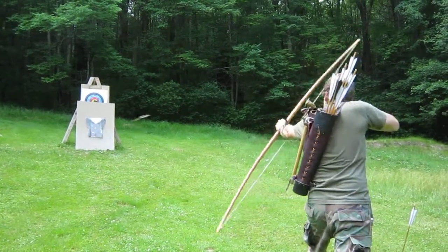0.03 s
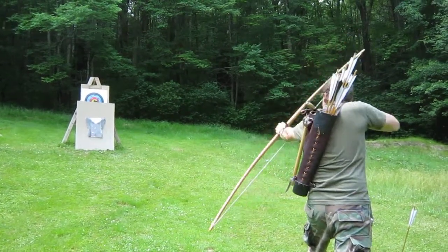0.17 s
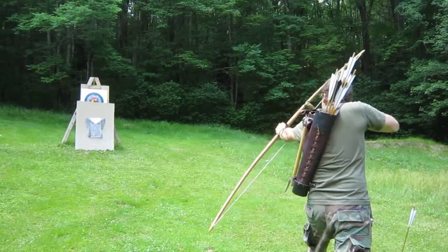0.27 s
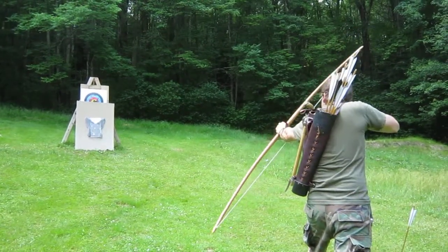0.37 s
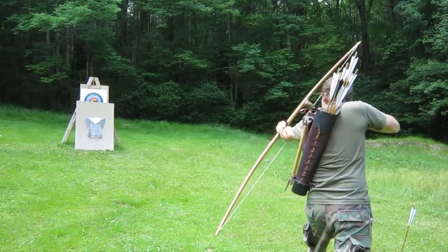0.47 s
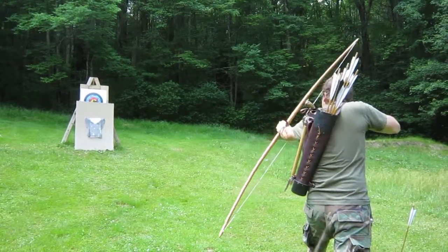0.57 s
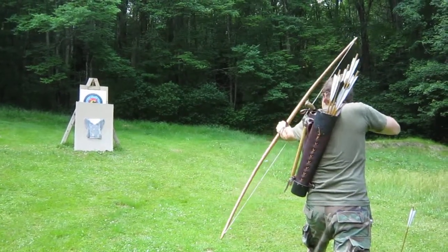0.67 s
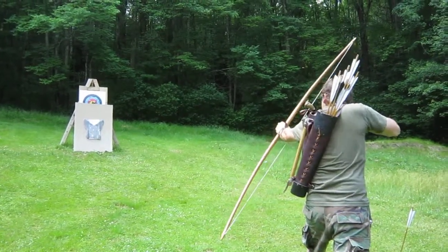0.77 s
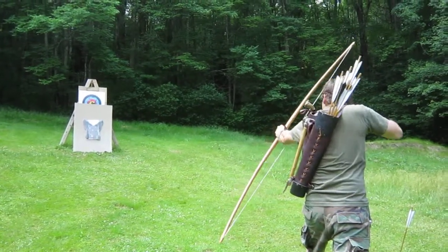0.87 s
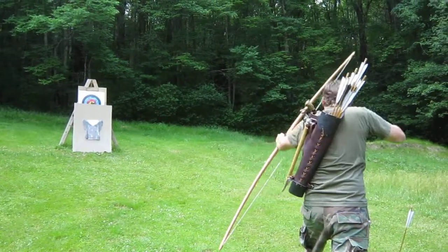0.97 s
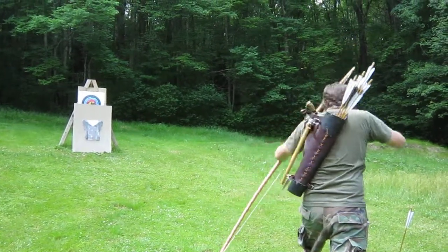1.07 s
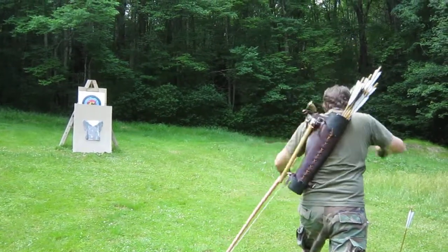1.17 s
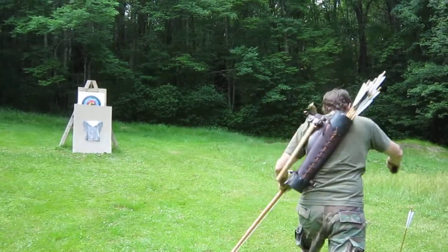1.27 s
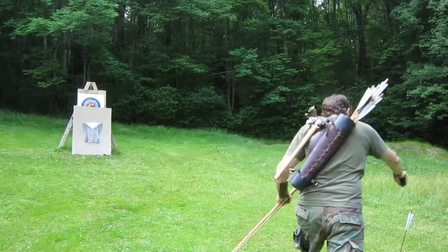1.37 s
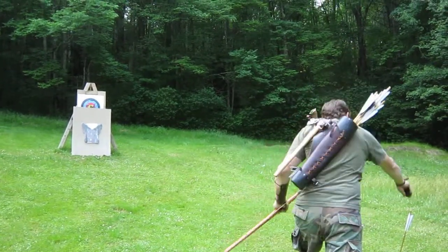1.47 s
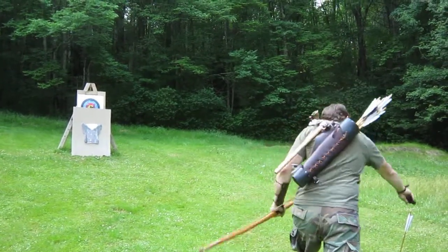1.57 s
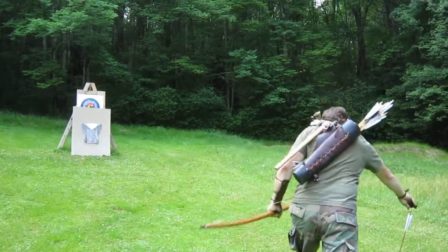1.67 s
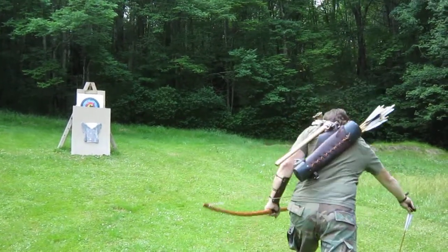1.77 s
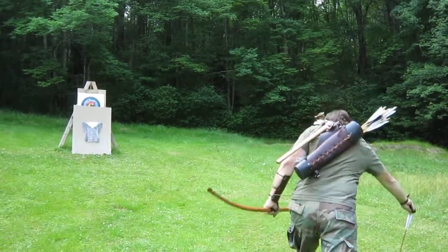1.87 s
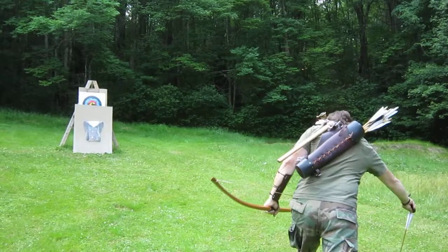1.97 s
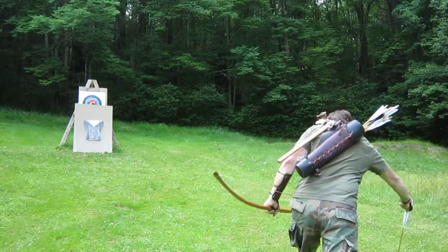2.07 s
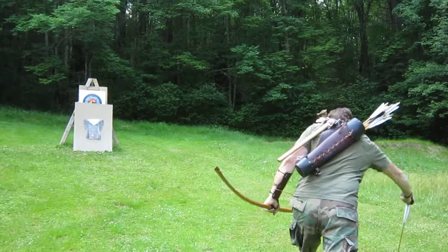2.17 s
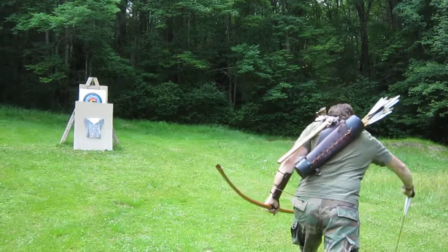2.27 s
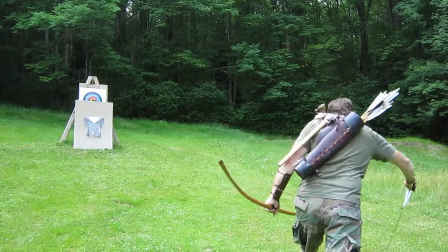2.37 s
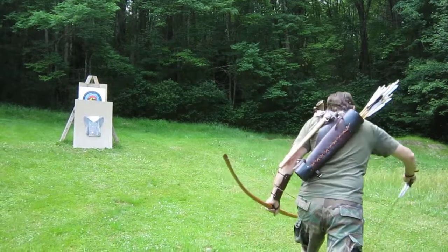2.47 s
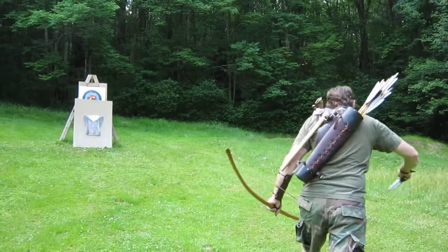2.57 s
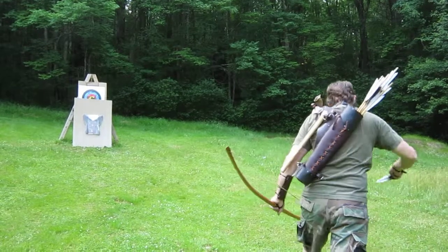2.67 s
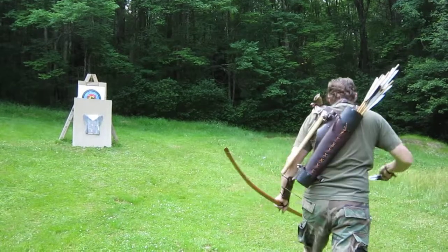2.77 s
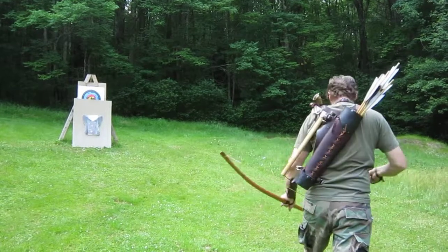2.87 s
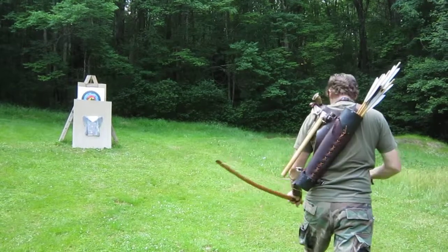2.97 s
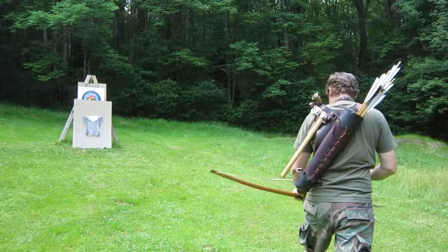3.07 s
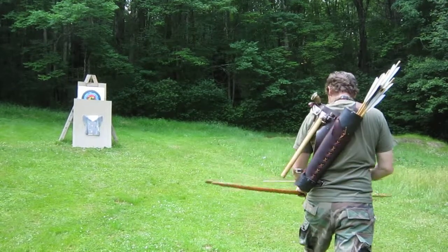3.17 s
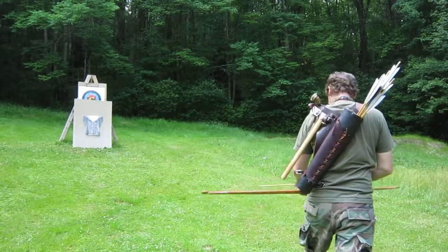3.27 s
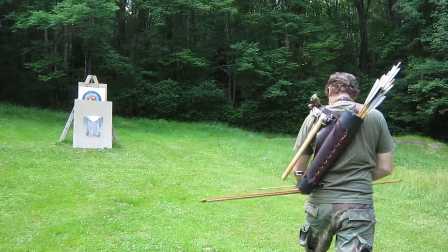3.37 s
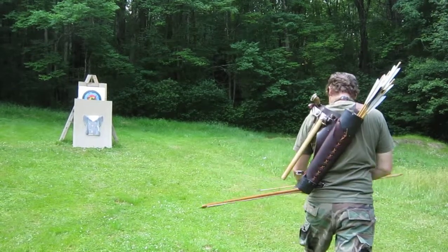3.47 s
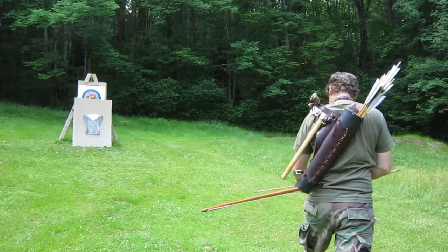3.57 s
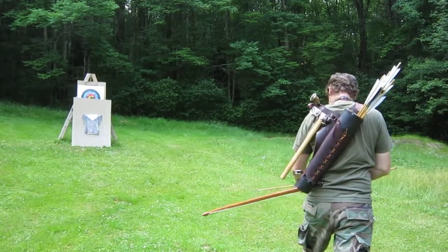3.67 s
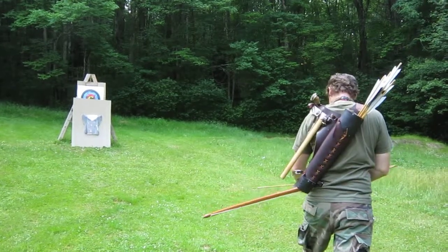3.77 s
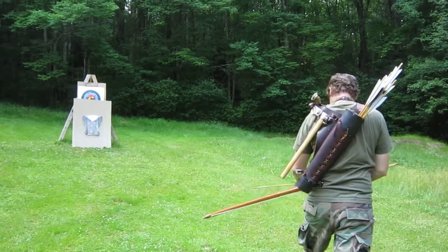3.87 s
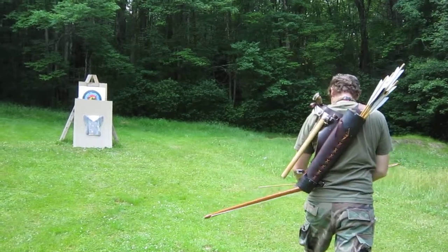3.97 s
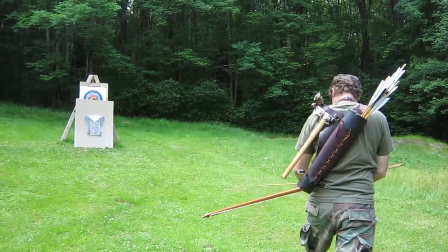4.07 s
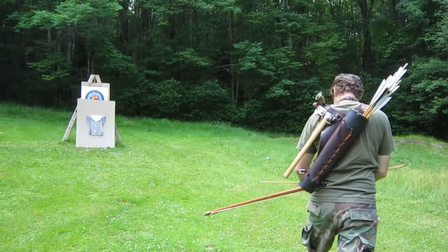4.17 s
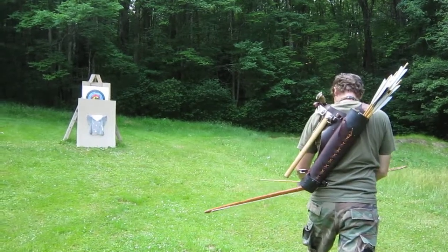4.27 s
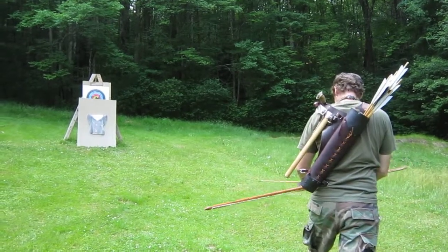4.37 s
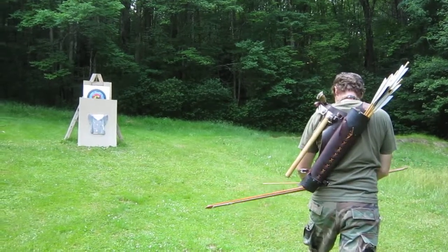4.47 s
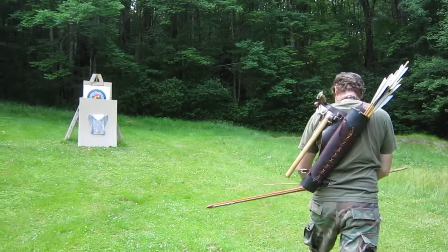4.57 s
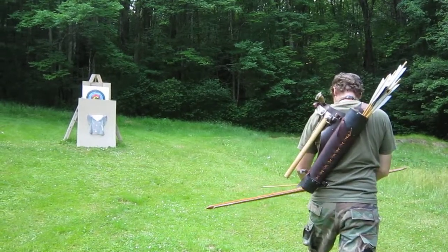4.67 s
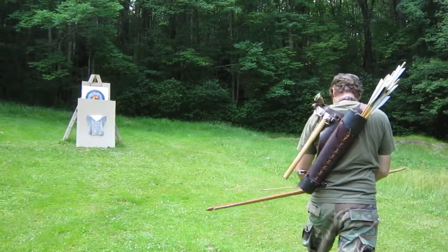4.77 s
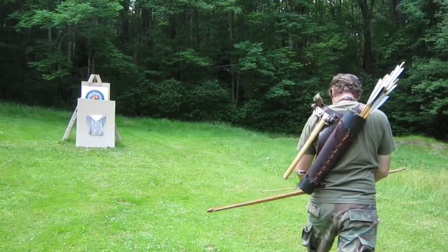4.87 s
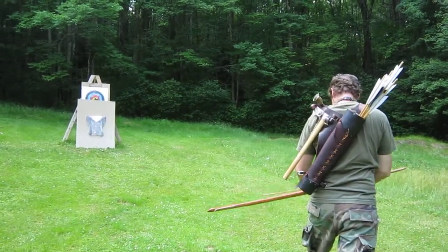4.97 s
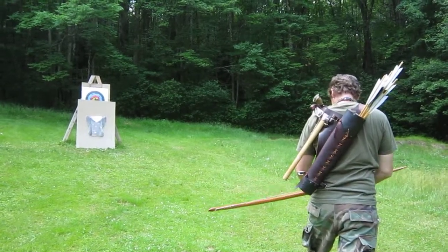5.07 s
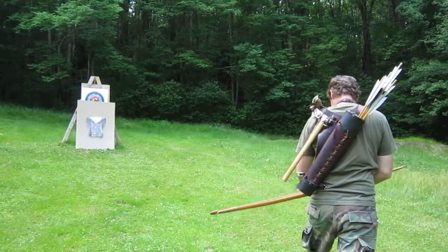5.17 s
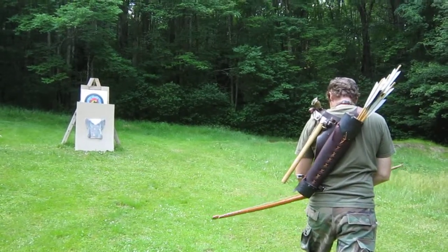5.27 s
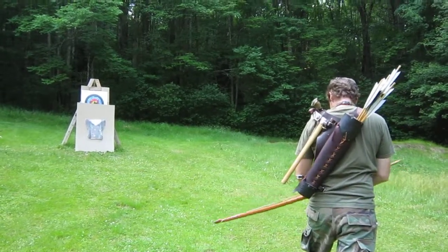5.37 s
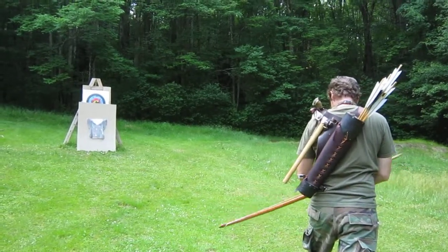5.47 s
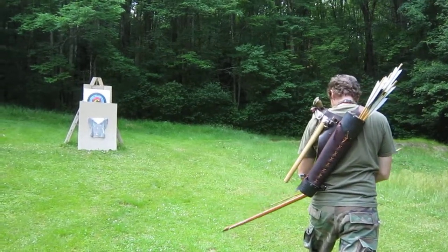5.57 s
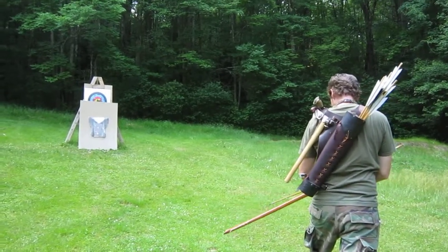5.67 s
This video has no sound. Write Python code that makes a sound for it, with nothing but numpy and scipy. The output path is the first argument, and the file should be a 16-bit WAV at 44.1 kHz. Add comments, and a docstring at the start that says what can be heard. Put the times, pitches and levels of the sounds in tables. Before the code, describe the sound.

A bowstring slaps and hums, an arrow hisses off and smacks a hard board, then woodland echoes, birdsong, small clicks and knocks follow.

```python
"""On a lawn ringed by woods, a longbow is shot: the string hums as a decaying sine, the feathers hiss as
shaped noise, and the arrow smacks into a board of damped modes. Noise bursts stand for the trees' echoes.
The next arrow clicks, then knocks on the bow; songbirds whistle gliding tones with a reverberant tail.
A noise wash and a far engine's swelling sine lie beneath. The camera's gain ducks at the blow and creeps back."""
import sys
import numpy as np
from scipy import signal
from scipy.fft import rfft, irfft
from scipy.io import wavfile
from scipy.ndimage import uniform_filter1d

SR = 44100
rng = np.random.default_rng(int(sys.argv[2]) if len(sys.argv) > 2 else 0)


def unload_wav(signal):
    """Save mono or channel-first audio to the path in sys.argv[1] as 16-bit WAV at rate SR, clipped to [-1, 1]."""
    wavfile.write(
        sys.argv[1],
        SR,
        np.round(np.clip(np.atleast_2d(signal).T, -1, 1) * 32767).astype(np.int16),
    )


N = 252690
TIME = np.arange(N) / SR

# Spectrum of the open air. Each row: frequency in Hz, relative density in dB per Hz.
AIR_SPECTRUM = [(15, -46), (25, -7), (71, -8.5), (104, -4), (116, -5.5), (133, -10), (552, -17.5),
                (804, -18.5), (1750, -25.5), (1950, -25), (2850, -25.5), (6380, -36.5), (7910, -43),
                (9550, -40.5), (15500, -46)]
AIR_DB = -49.5
# Far engine: nearly steady in pitch, swelling over a low base level.
DRONE_HZ, DRONE_DB = 104.1, -61.5
# Swells of the engine. Each row: middle in seconds, half length (to 1/e) in seconds, level in dB.
DRONE_SWELLS = [(.55, .17, -55), (1.6, 0.39, -60), (2.8, .8, -57.5), (4.74, 0.17, -52), (5.33, .1, -53),
                (5.62, .16, -54)]

# Bird calls, slurred evenly through their pitches.
# Each row: start in seconds, length in seconds, relative level in dB, pitches in Hz.
BIRD_CALLS = [(1.184, .12, -64, (2570, 2600)), (1.222, .075, -56.5, (3330, 3400, 3650)),
              (1.266, .17, -56, (3950, 4000, 3700, 4000, 3970, 3950)), (1.85, .15, -71, (7400, 6700)),
              (2.01, .13, -57, (5400, 5170, 5300, 6900, 6650)),
              (2.694, .16, -55, (3450, 3800, 2550, 5050, 4300, 4700)), (3.13, .06, -62.5, (2840, 2900)),
              (3.855, .265, -60, (5200, 5370, 5290, 5490, 4300, 5200, 4300, 4300)),
              (3.9, 0.076, -62, (3480, 3570)), (4.651, .13, -60.5, (3050, 2850, 2894, 2350, 2400)),
              (5.127, 0.074, -55, (5270, 5050))]
CALL_ATTACK_S, CALL_RELEASE_S = 0.0098, 0.019
WARBLE_HZ, WARBLE_SHARE = 110, .016  # mean rate, and depth as a share of the pitch
# Fainter chirps at random: middle pitch, spread in octaves, fall as a share of pitch, length, relative level.
FAR_CHIRP_HZ, FAR_SPREAD_OCT, FAR_FALL_SHARE, FAR_CHIRP_S, FAR_CHIRP_REL_DB = 2500, .25, 0.0395, .08, -68

# Spectrum of the blow scattered by the woods. Each row: frequency in Hz, relative density in dB per Hz.
ECHO_SPECTRUM = [(70, -20), (200, -5), (380, 3), (600, -21), (850, -7), (1200, 6), (2000, 1), (2800, -15),
                 (5500, -22), (8000, -31), (13000, -39), (16000, -38)]
# Returns from the trees. Each row: start in seconds, level in dB, 60 dB decay time in seconds.
TREE_RETURNS = [(.24, -52.5, 2.7), (.281, -51, .06), (.313, -48, .06), (.385, -52.5, .16), (.452, -42, .08)]

# Light clicks of arrows and gear.
# Each row: start in seconds, relative level in dB, brightness in dB per octave.
CLICKS = [(.926, -52, 2.5), (1.571, -46, 2.5), (1.6716, -43, -5), (1.8876, -41, -3.5), (2.3806, -26, 0),
          (2.5406, -45.5, 2.5), (3.4545, -54, 2)]
# Modes of an arrow shaft. Each row: frequency in Hz, relative level in dB, 60 dB decay time in seconds.
SHAFT_MODES = [(1245, -17, .012), (2340, -4, .011), (3150, -13, .007), (4080, -13, .008),
               (6760, -10.5, 0.0072), (9100, -6, 0.004), (10300, -17, .006), (11400, -13, .006)]
# Knocks of the next arrow on the bow.
# Each row: start in seconds, relative level in dB, brightness in dB per octave.
KNOCKS = [(5.4378, -40, -7.5), (5.6163, -34, -0.5), (5.6212, -42, -1), (5.628, -47, 1)]
# Modes of the bow wood. Each row: frequency in Hz, relative level in dB, 60 dB decay time in seconds.
BOW_MODES = [(1170, -12, 0.025), (1680, -4, 0.018), (1880, -3, .02), (2500, -6.5, 0.018),
             (3340, -11, 0.016), (3680, -14, 0.016), (4270, -18, .015)]

# The bowstring hums evenly, then is damped.
STRING_HZ, STRING_DB, STRING_HOLD_S, STRING_T60_S = 106.5, -44, .26, 0.23
# Spectrum of the feather hiss. Each row: frequency in Hz, relative density in dB per Hz.
FEATHER_SPECTRUM = [(200, -7), (500, -6), (1100, 2), (1800, -4), (3000, -0.5), (5200, -2.5), (7000, -14),
                    (10000, -17), (15000, -26)]
# The feather hiss sets in quickly, holds, and fades as the arrow flies down the lawn.
FEATHER_DB, FEATHER_RISE_S, FEATHER_HOLD_S, FEATHER_T60_S = -52, .015, .125, .55
# The tail kicks sideways once and hisses louder.
KICK_S, KICK_WIDTH_S, KICK_DB = 0.144, 0.0075, -54.5

# The point strikes, then the shaft is stopped.
# Each row: start in seconds, relative ring level in dB, relative crack level in dB.
BLOWS = [(.2228, -2.5, -12), (.2257, -2.5, -19)]
# Modes of board and shaft. Each row: frequency in Hz, relative level in dB, 60 dB decay time in seconds.
BOARD_MODES = [(1000, -23, 0.024), (1165, -12, 0.026), (1405, -10, 0.023), (1733, -13.5, 0.016),
               (1986, -20.5, 0.038), (2570, -26, .016), (3220, -23.5, .016), (3500, -26, 0.013),
               (4350, -23.5, 0.012), (4840, -31, 0.011), (5170, -24, 0.01)]
# Spectrum of splintering at the point. Each row: frequency in Hz, relative density in dB per Hz.
CRACK_SPECTRUM = [(300, -9), (700, -3), (1200, -1), (2000, 5), (5000, 1.5), (7000, -17), (10000, -10.5),
                  (13000, -8), (16000, -46)]
# Spectrum of the shuddering stand. Each row: frequency in Hz, relative density in dB per Hz.
STAND_SPECTRUM = [(60, -22), (170, 9), (300, 3), (430, -11), (530, -23), (850, -11.5), (1150, 0.5),
                  (1480, 0.5), (1750, -16), (2000, -5), (2500, -25), (5000, -29), (8000, -41), (13000, -38)]

TOP_HZ = 15850  # upper limit of the camera


def undb(db):
    """A level in decibels is twenty times the logarithm of the amplitude ratio returned here."""
    return 10 ** (np.asarray(db) / 20)


def noise(points):
    """Filtered noise: white noise takes on a spectrum of (Hz, dB) points and is scaled to unit spread."""
    hz, db = np.transpose(points)
    bin_hz = np.maximum(np.arange(N // 2 + 1) * SR / N, 1)
    gain = undb(np.interp(np.log(bin_hz), np.log(hz), db))
    y = irfft(rfft(rng.standard_normal(N)) * gain, N)
    return y / y.std()


def drift(rate):
    """Slow random fluctuation: values drawn at a rate in Hz are smoothed and scaled to unit spread."""
    step = int(SR / rate)
    draws = rng.standard_normal(N // step + 1)
    y = uniform_filter1d(np.repeat(draws, step), step)[:N]
    return y / y.std()


def age(start):
    """Causality: seconds elapsed since a moment, zero before it."""
    return np.maximum(TIME - start, 0)


def decay(t, t60):
    """Exponential damping: the amplitude falls 60 dB in t60 seconds."""
    return np.exp(-np.minimum(np.log(1000) * t / t60, 100))  # bounded against underflow


def fade(start, t60, rise):
    """Excitation and damping: an exponential rise multiplied by an exponential decay."""
    t = age(start)
    return (1 - np.exp(-t / rise)) * decay(t, t60)


def hold(until, t60):
    """Delayed damping: the amplitude stays level, then decays exponentially."""
    return decay(age(until), t60)


def hump(middle, half_length):
    """Gaussian envelope: the amplitude swells and ebbs evenly about one moment."""
    return np.exp(-((TIME - middle) / half_length) ** 2)


def ring(start, modes, bright_db=0):
    """Modal superposition: damped sines start together, tilted in dB per octave about the second mode."""
    t = age(start)
    live = (t > 0) & (t < .5)
    t, y = t[live], np.zeros(N)
    for hz, db, t60 in modes:
        tilt_db = bright_db * np.log2(hz / modes[1][0])
        y[live] += undb(db + tilt_db) * np.sin(2 * np.pi * hz * t) * np.exp(-np.log(1000) * t / t60)
    return y


def woods(x, t60, rise):
    """Diffuse scattering: countless trunks and leaves act as convolution with a unit-energy noise tail."""
    tail = rng.standard_normal(N) * fade(0, t60, rise)
    return signal.fftconvolve(x, tail / np.sqrt(np.sum(tail ** 2)))[:N]


def outdoors():
    """Incoherent far sources: traffic and leaves sum to noise, while one engine remains a tone."""
    wash = noise(AIR_SPECTRUM) * undb(AIR_DB + 0.45 * drift(5.02))
    hz = DRONE_HZ + .4 * drift(9)
    waver_db = 1.0 * drift(10)
    swells = sum(undb(db) * hump(s, half_length) for s, half_length, db in DRONE_SWELLS)
    level = undb(DRONE_DB) + swells
    tone = np.sqrt(2) * np.sin(2 * np.pi * np.cumsum(hz) / SR)
    return wash + tone * level * undb(waver_db)


def whistle(start, length, pitches, warble):
    """Frequency modulation: the phase integrates a warbling glide, under a quick attack and short release."""
    live = (TIME > start) & (TIME < start + length)
    t, y = TIME[live] - start, np.zeros(N)
    hz = np.interp(t, np.linspace(0, length, len(pitches)), pitches) * warble[live]
    envelope = np.minimum(1, np.minimum(t / CALL_ATTACK_S, (length - t) / CALL_RELEASE_S))
    y[live] = envelope * np.sin(2 * np.pi * np.cumsum(hz) / SR)
    return y


def far_chirps(warble, count):
    """Falling glides: faint chirps are loosely spaced, each on a random pitch."""
    chance = rng.uniform(-1.1, 1, (count, 2))
    starts = (np.arange(count) + 1 + .5 * chance[:, 0]) * TIME[-1] / (count + 1)
    pitches = FAR_CHIRP_HZ * 2 ** (FAR_SPREAD_OCT * chance[:, 1])
    chirps = sum(whistle(s, FAR_CHIRP_S, (hz, hz * (1 - FAR_FALL_SHARE)), warble)
                 for s, hz in zip(starts, pitches))
    return undb(FAR_CHIRP_REL_DB) * chirps


def birds():
    """Direct and reverberant field: from deep in the trees, the scattered song outweighs the direct whistle."""
    warble_hz = WARBLE_HZ + 20 * drift(40)
    warble = 1 + WARBLE_SHARE * np.sin(2 * np.pi * np.cumsum(warble_hz) / SR)
    song = sum(undb(db) * whistle(s, length, pitches, warble) for s, length, db, pitches in BIRD_CALLS)
    song = song + far_chirps(warble, count=5)
    return undb(-5) * song + undb(4.5) * woods(song, t60=1.27, rise=0.015)


def echoes():
    """Selective reflection: trunks return uneven bursts, the wood's edge a thump, foliage the brightest part."""
    bursts = sum(undb(db) * fade(s, t60, rise=.006) for s, db, t60 in TREE_RETURNS)
    trunks = noise(ECHO_SPECTRUM) * undb(2 * drift(80.1)) * bursts
    boom = noise([(70, -35), (150, -4), (240, -2.0), (330, -7), (520, -37), (2000, -60)])
    boom *= fade(.277, t60=0.23, rise=.005)
    leaves = noise([(1000, -18), (3000, 0), (5500, 1), (8000, -7), (13000, -12), (16000, -23)])
    leaves *= fade(.29, t60=0.51, rise=0.047)
    return trunks + undb(-38.5) * boom + undb(-47.5) * leaves


def arrow_clicks():
    """Impact excitation: shafts clicking together ring their modes and add a burst of contact noise."""
    grit = noise([(800, -18), (2500, 7), (6000, -1), (12000, -10), (15000, -22)])
    clicks = np.zeros(N)
    for s, db, bright_db in CLICKS:
        contact = undb(-15) * grit * fade(s, t60=.012, rise=.0002)
        clicks += undb(db) * (ring(s, SHAFT_MODES, bright_db) + contact)
    return clicks


def bow_knocks():
    """Impact and friction: the next arrow rings the bow's modes and scuffs the wood, and the woods scatter it."""
    scuff = noise([(600, -16), (1100, 2), (1800, 1), (2800, -4), (4200, -9), (6000, -32)])
    knocks = np.zeros(N)
    for s, db, bright_db in KNOCKS:
        friction = undb(-10) * scuff * fade(s, t60=0.042, rise=0.00054)
        knocks += undb(db) * (ring(s, BOW_MODES, bright_db) + friction)
    return knocks + undb(-5) * woods(knocks, t60=0.55, rise=.004)


def release():
    """String vibration and turbulence: the string slaps home and hums, while the feathers flutter away as noise."""
    slap = noise([(80, -1), (300, 3.0), (1100, -1), (2500, -6), (6000, -13), (14000, -33)])
    slap *= fade(0, t60=0.081, rise=0.0031)
    hum = np.sqrt(2) * np.sin(2 * np.pi * STRING_HZ * TIME)
    string = hum * undb(STRING_DB) * hold(STRING_HOLD_S, STRING_T60_S)
    flight = undb(FEATHER_DB) * (1 - np.exp(-TIME / FEATHER_RISE_S)) * hold(FEATHER_HOLD_S, FEATHER_T60_S)
    kick = undb(KICK_DB) * hump(KICK_S, KICK_WIDTH_S)
    in_flight = TIME < BLOWS[0][0]
    feathers = noise(FEATHER_SPECTRUM) * undb(1.2 * drift(70)) * (flight + kick) * in_flight
    return undb(-31) * slap + string + feathers


def panel_thump(start, hz, swell_s, db, leak_hz):
    """Damped piston motion: the pushed panel swings back, and air slipping round its edges loses the deep bass."""
    t = age(start)
    envelope = t / swell_s * np.exp(1 - np.minimum(t / swell_s, 100))
    swing = undb(db) * envelope * np.sin(2 * np.pi * hz * t)
    return signal.sosfilt(signal.butter(2, leak_hz, "high", fs=SR, output="sos"), swing)


def impact():
    """Impulsive excitation: the arrow cracks into a ringing board, and its whipping shaft shakes the stand."""
    crack = noise(CRACK_SPECTRUM)
    thump = panel_thump(start=.2234, hz=245, swell_s=0.0014, db=0, leak_hz=83)
    rings = sum(undb(ring_db) * ring(s, BOARD_MODES) for s, ring_db, _ in BLOWS)
    cracks = sum(undb(crack_db) * crack * fade(s, t60=0.0085, rise=0.00031) for s, _, crack_db in BLOWS)
    # the board's short bending waves radiate poorly in the bass
    radiate_hz = 720
    rings = signal.sosfilt(signal.butter(2, radiate_hz, "high", fs=SR, output="sos"), rings)
    # each swing of the shaft rattles it in its hole
    whip_hz, whip_depth = 157, .45
    rattle = 1 + whip_depth * np.cos(2 * np.pi * whip_hz * age(BLOWS[0][0]))
    shudder = noise(STAND_SPECTRUM) * rattle * fade(.226, t60=.15, rise=.002)
    return thump + rings + cracks + undb(-25.5) * shudder


def scene():
    """Superposition: the pressures of all sources add at the one microphone."""
    background = outdoors() + birds() + echoes()
    return (background + arrow_clicks() + bow_knocks() + release() + impact())[None]


def gain_control(x, threshold_db, depth, attack_s, release_s):
    """Dynamic compression: a loud peak winds the gain down; it then creeps back."""
    over_db = np.maximum(20 * np.log10(np.abs(x[0]) + 1e-9) - threshold_db, 0)
    leak = np.exp(-TIME / release_s)
    held = np.maximum.accumulate(over_db / leak) * leak  # peaks held, leaking away
    # a rounded window spreads each change over the attack time
    ramp = np.clip(TIME / attack_s, 0, 1)
    window = ramp * (1 - ramp)
    smooth_db = signal.fftconvolve(held, window / window.sum())[:N]
    return x * undb(-depth * smooth_db)


def record(dry):
    """Band and amplitude limits: the camera notches its own motor band, clips, rides the gain and cuts the top."""
    notch_hz, notch_width_hz = 7900, 2200
    x = signal.lfilter(*signal.iirnotch(notch_hz, notch_hz / notch_width_hz, fs=SR), dry)
    x = np.clip(x, -.71, .71)
    x = gain_control(x, threshold_db=-16.5, depth=0.68, attack_s=0.59, release_s=0.54)
    return signal.sosfilt(signal.ellip(10, .1, 70, TOP_HZ, fs=SR, output="sos"), x)


dry = scene()
out = record(dry)
unload_wav(out)
```